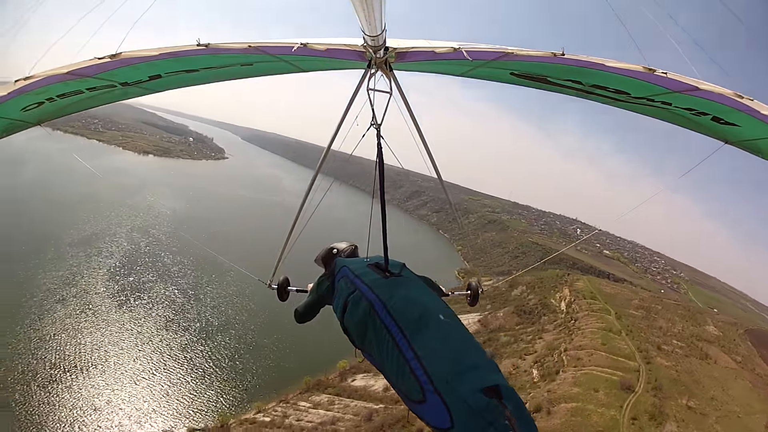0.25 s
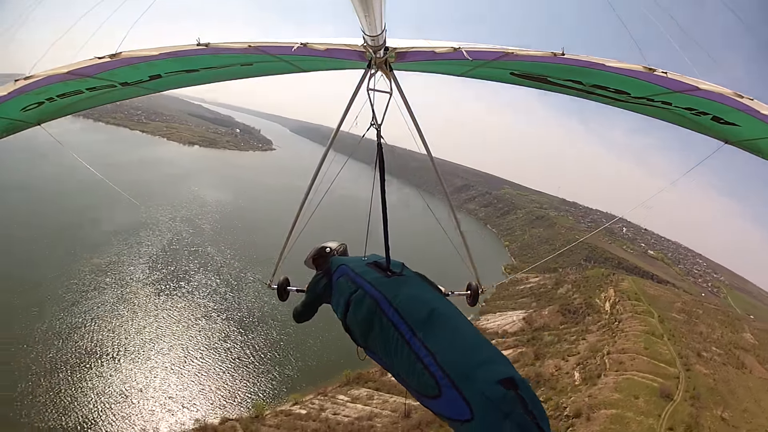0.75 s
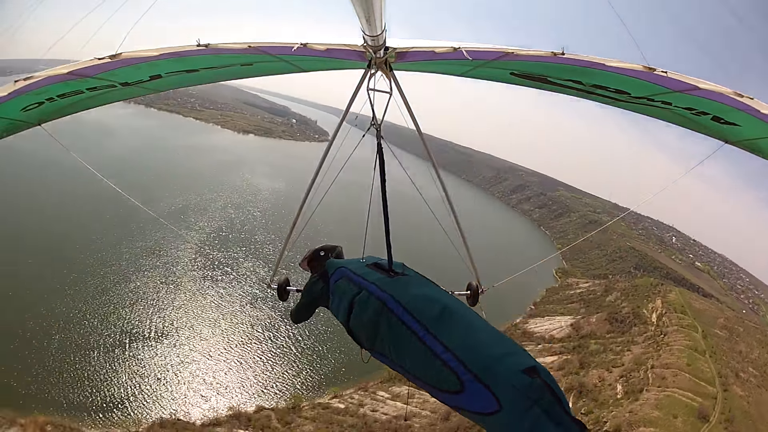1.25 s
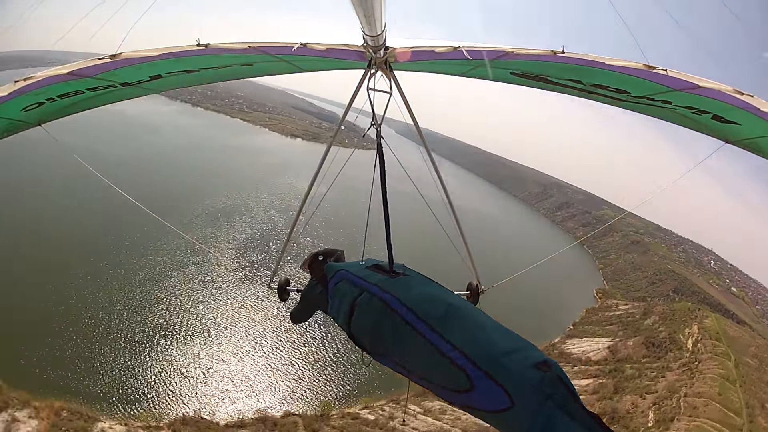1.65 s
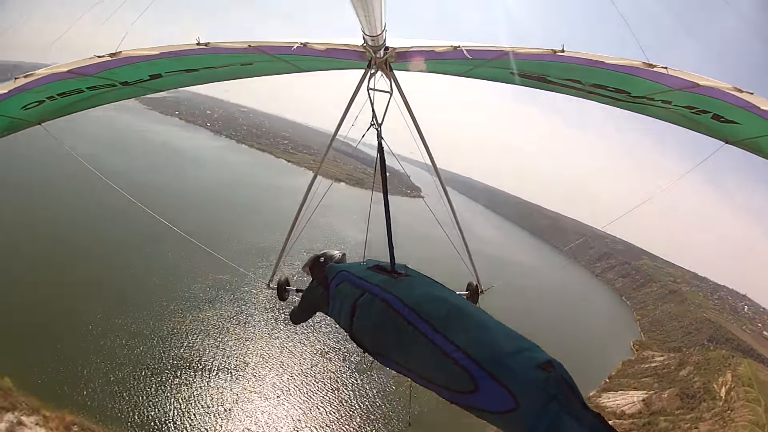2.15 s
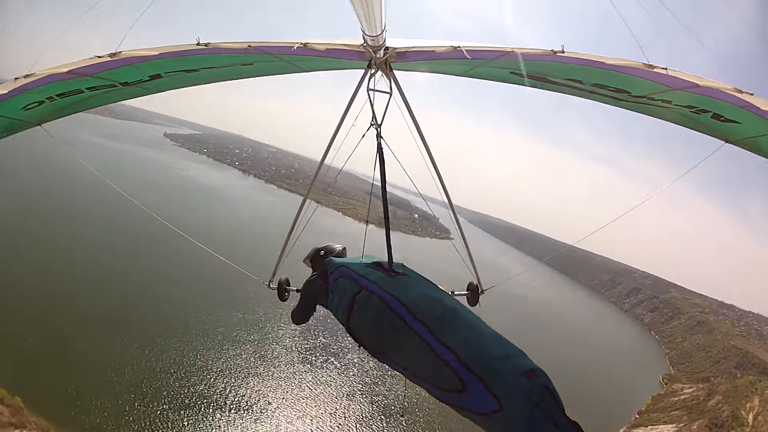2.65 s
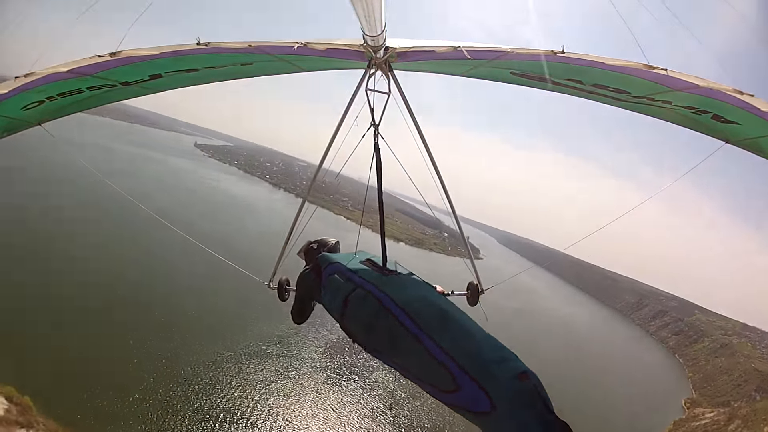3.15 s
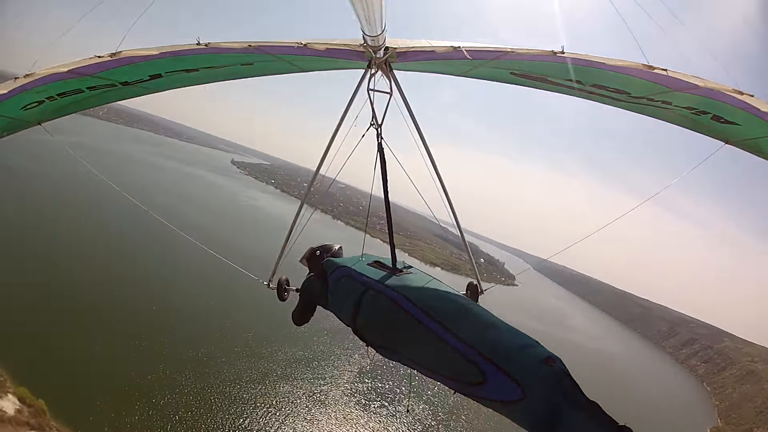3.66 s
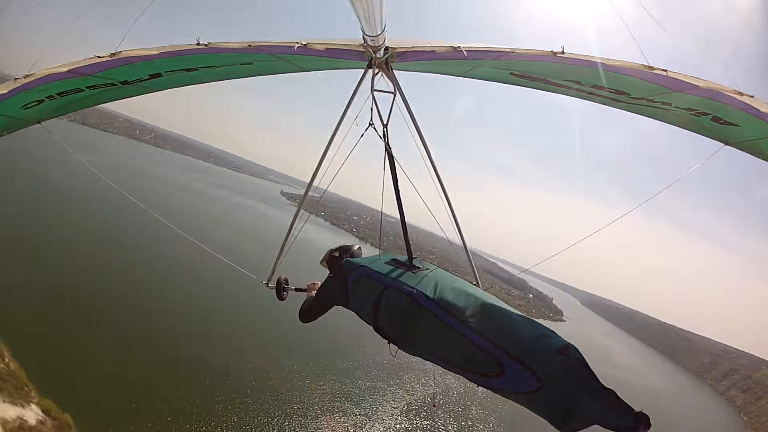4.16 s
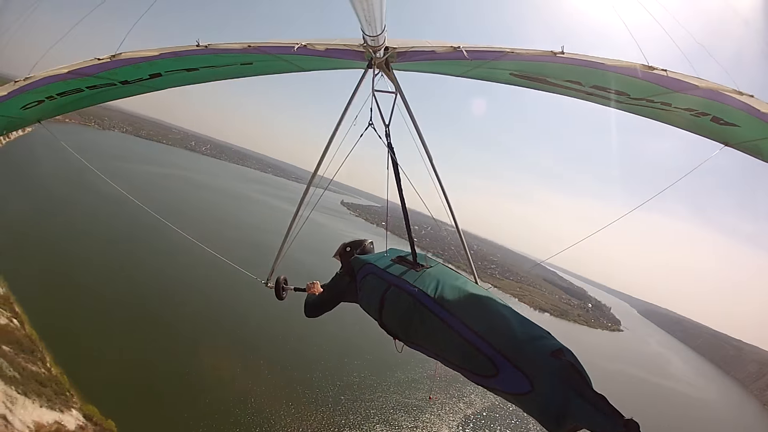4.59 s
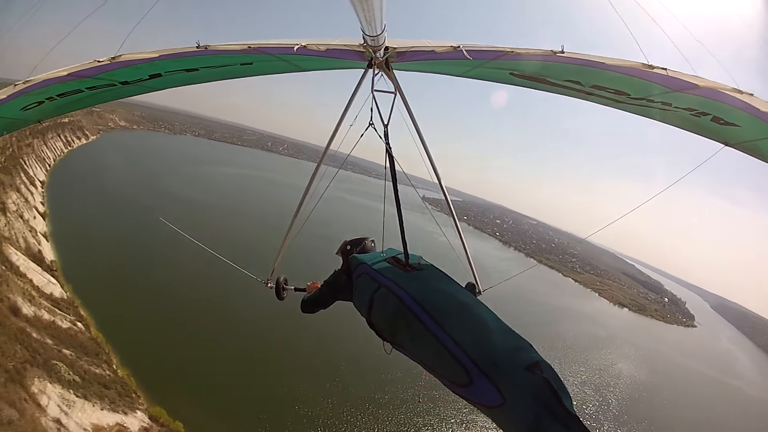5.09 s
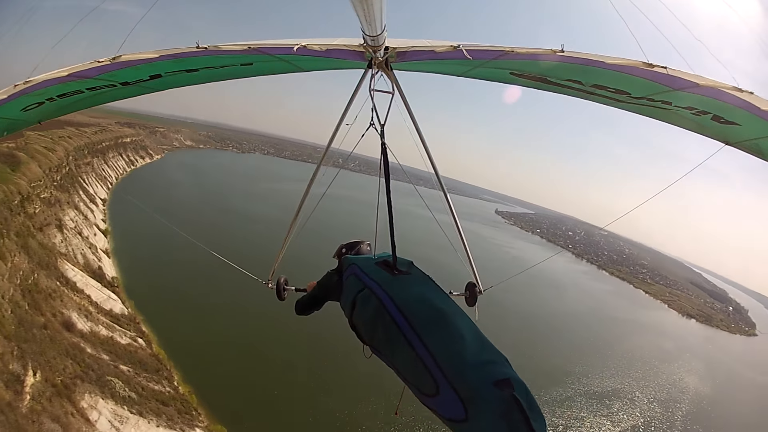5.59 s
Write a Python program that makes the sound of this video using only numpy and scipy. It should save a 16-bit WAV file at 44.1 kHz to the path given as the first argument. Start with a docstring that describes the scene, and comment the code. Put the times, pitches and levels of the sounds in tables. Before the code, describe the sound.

Heard from a camera housing fixed to a hang glider in open air: quiet, uneven wind rumble and dull flow noise, with a few isolated knocks. Knocks cluster just before two seconds, then a gust swells into heavy low buffeting and sail flutter. It eases, and one strong knock stands out past four seconds, followed by small scattered taps and a slightly hissier airflow.

```python
"""Hang glider in flight, heard at the keel tube

A small camera in its housing rides on the tube. Air buffets tube and sail: filtered noise makes a rumble
that swells in a gust, and a row of wavering overtones makes the sail flutter. Flow noise rings in the
frame, fittings knock, tick and rattle on it as decaying sines, and a wire hums faintly. The converter
holds each sample at a low rate, which mirrors the sound into the treble.
"""
import sys
import numpy as np
from scipy import signal
from scipy.io import wavfile
from scipy.ndimage import uniform_filter1d

SR = 44100
rng = np.random.default_rng(int(sys.argv[2]) if len(sys.argv) > 2 else 0)


def dump_mix(stems):
    """Bounce the given channels to the path in sys.argv[1] as a 16-bit WAV at rate SR."""
    frames = np.atleast_2d(stems).T  # one column per channel
    limited = np.clip(frames, -1, 1)  # hard clip at full scale
    pcm = np.round(limited * 32767).astype(np.int16)
    wavfile.write(sys.argv[1], SR, pcm)


N = 257103

# Ways in which the frame and housing ring, from low to high. Each row: pitch in Hz, time in seconds to die
# away by 60 dB after a knock, relative level in dB when knocked, relative level in dB in the airflow.
LOW_MODES = [(362, 0.053, 4.5, -3)]
MID_MODES = [(530.7, 0.032, 3, 3.5), (589, 0.02, 3, 0.81)]
MAIN_MODES = [(810, 0.027, -4, -1), (847, 0.047, -7, 1), (1014, 0.024, 3, 0), (1126.6, 0.048, -1, -2.5),
              (1197, 0.033, -5.5, -10.5), (1425, 0.028, -11, -7)]
HIGH_MODES = [(1921, 0.053, -13.5, -2), (2080, 0.0096, 4.5, -4), (2467, 0.013, 5.5, 3),
              (2858, 0.015, 3.5, -5), (3370, 0.014, -16, -11), (3680, 0.0088, -10.5, -7),
              (4777, 0.028, 0, -17.5), (5320, 0.0085, -14, -15.5)]

SOFT_HZ = 1960   # padding between fitting and tube dulls the contact above this


def rumble():
    """Buffeting air bends the tube; a deep and an upper part swell and sink separately."""
    # Strength of the buffeting. Each row: time in seconds, deep level in dB, upper level in dB.
    swells = [(0, -41.5, -42), (.34, -30, -38), (.5, -41, -38.5), (.85, -35.5, -39), (1.45, -38, -42),
              (1.6, -33, -40), (1.95, -39, -35), (2.1, -29, -42), (2.3, -28.5, -33), (2.55, -27, -26.5),
              (2.75, -25, -32), (2.95, -28.5, -29.5), (3.15, -27.5, -26), (3.28, -36, -37),
              (3.51, -31.5, -33.5), (3.67, -37.5, -38), (4.16, -33, -36.5), (4.3, -45, -37.5),
              (4.35, -25, -34.5), (4.48, -37, -42.5), (4.55, -30.5, -33.5), (4.87, -35.5, -42),
              (5.3, -40.5, -33.5), (5.55, -40.5, -43.5), (5.76, -30, -33.5), (5.83, -32, -38)]
    # Bending of the tube. Each row: pitch in Hz, width of the resonance in Hz, relative level in dB.
    deep_modes = [(48.6, 18, -10.5), (60.76, 13.3, -5), (35, 36, -48)]
    upper_modes = [(97.5, 24.6, -0.5), (143.4, 41, -9), (203, 87, -37), (160, 280, -10.5)]
    deep_db, upper_db = in_time(swells)
    deep = amp(deep_db) * buffeting(deep_modes, evening=0.25)
    upper = amp(upper_db) * buffeting(upper_modes, evening=0.24)
    return deep + upper


def buffeting(modes, evening):
    """Turbulence, as noise, drives each bending mode separately."""
    out = 0
    for hz, width, db in modes:
        t60 = np.log(1000) / np.pi / width
        noise = rng.standard_normal(N + SR)
        bending = ring(ring(noise, hz, t60), hz, t60)[SR:]   # drop the first second, while it builds up
        out = out + amp(db) * rms_one(bending)
    out = steep(out, 40.0, "high", order=3)
    out = steep(out, 353, "low", order=2)
    # The noise's own slow swells are partly evened, so that the level curve shapes the rumble.
    swell = uniform_filter1d(uniform_filter1d(out ** 2, size=2000), size=2000)
    return rms_one(out / (swell + .05 * np.mean(swell)) ** (evening / 2))


def flow_noise(roar_db, hiss_db):
    """Broad flow noise plus noise ringing in the frame; lows follow the roar, highs the hiss."""
    # Broad noise between the resonances. Each row: pitch in Hz, relative level in dB per Hz.
    spectrum = np.array([(120, -30), (200, 5.5), (285, -6.5), (358, 2.5), (431, -7.5), (557, -3), (700, -3),
                         (1120, -5), (1720, -11.5), (2480, -12), (3070, -20), (3700, -26), (4140, -29.5),
                         (5280, -29), (6000, -47), (7800, -77), (13200, -120)])
    edges = 180 * 2 ** np.arange(0, 5.1, 1 / 3)   # third-octave bands
    white = rng.standard_normal((2, N))   # neighbouring bands take turns with two noises
    gust = drift(25)
    broad = [0, 0]   # low part, high part
    for k, (low, high) in enumerate(zip(edges, edges[1:])):
        middle = np.log(low * high) / 2
        db = np.interp(middle, np.log(spectrum[:, 0]), spectrum[:, 1])
        band = steep(white[k % 2], [low, high], "band", order=2)
        broad[int(low > 1300)] += band * amp(db + 1.5 * gust + 1.4 * drift(17.6))
    rung = [0, 0]   # low part, high part
    for hz, t60, _, db in LOW_MODES + MID_MODES + MAIN_MODES + HIGH_MODES:
        once = ring(rng.standard_normal(N), hz, t60 * 0.75)
        twice = ring(once, hz, t60 * 0.75)   # the second pass makes the resonance fall off steeply
        rung[int(hz > 1450)] += rms_one(twice) * amp(db + 0.19 * gust + 1.3 * drift(8.4))
    roar = broad[0] / np.std(broad[0]) * amp(-2) + rms_one(rung[0]) * amp(-4.5)
    hiss = rms_one(broad[1]) * amp(-3) + rms_one(rung[1]) * amp(-4.5)
    return amp(roar_db) * roar + amp(hiss_db) * hiss


def flutter():
    """The sail's edge beats almost regularly; each overtone wavers on its own."""
    # Flutter in the gust. Each row: time in seconds, beats per second, level in dB.
    beating = [(2.05, 58.6, -45), (2.33, 51.5, -43), (2.65, 46.5, -29.5), (2.95, 48.6, -35),
               (3.2, 45, -36.5), (3.4, 47, -46)]
    # Overtones of the beat. Each row: multiple of the beat rate, relative level in dB.
    overtones = [(1, 1.5), (2, 2), (3, 0.5), (4, -6), (5, -18.5)]
    rate, db = in_time(beating)
    turn = 2 * np.pi * np.cumsum(rate) / SR
    beats = 0
    for k, level_db in overtones:
        level = amp(level_db + 1.2 * drift(8))
        beats = beats + level * np.sin(k * turn + 0.67 * drift(2.2))
    return amp(db) * fade(beating) * beats


def knocks():
    """A knock rings, thuds and sounds hollow in its own mix, which also reaches the middle and high modes."""
    # Knocks of fittings. Each row: time in seconds, ring level in dB, thud level in dB, hollow level in dB.
    hits = [(0.4688, -28.5, -41, -34.5), (0.9391, -27, -36, -51), (1.0799, -37, -45, -64),
            (1.4306, -35.5, -54, -40), (1.456, -45, -51, -38.5), (1.5437, -50, -44, -36),
            (1.582, -50, -49, -35), (1.6653, -27, -34, -34), (1.7532, -35, -44, -41),
            (1.8249, -23.5, -40, -31), (1.8715, -27, -36, -26.5), (1.9048, -26.5, -31, -26.5),
            (1.9287, -26, -35, -27.5), (1.9454, -29, -42, -44), (1.9624, -39, -33.5, -26),
            (1.9954, -26, -35, -29), (2.0664, -29.5, -55, -30.5), (2.51, -28, -50, -34),
            (2.6074, -31, -44, -35), (2.622, -37, -37, -45), (2.638, -41, -42, -32), (2.809, -36, -49, -43),
            (2.8457, -35, -53, -34), (2.8745, -26, -38, -38), (2.9085, -30, -35, -34),
            (2.941, -32, -33, -55), (3.0494, -38, -39, -39), (3.4064, -37, -47, -41),
            (3.5335, -21, -35, -40), (3.7344, -34, -29, -40), (3.923, -34, -38.5, -62),
            (4.118, -35, -32, -51), (4.287, -14, -20, -35), (4.3434, -37, -37.5, -37),
            (4.512, -43, -37, -47), (4.5667, -48, -37, -44), (4.585, -30.5, -34, -39),
            (4.6364, -40, -41, -53), (4.6796, -31, -35, -38), (4.7161, -35, -29, -40),
            (4.7411, -40, -33.5, -61), (4.835, -40, -53, -66), (4.9151, -33, -35, -53),
            (5.1668, -31.5, -42, -60), (5.4624, -38, -46, -43), (5.7565, -26, -29.5, -44)]
    # Short thuds of the shell. Each row: pitch in Hz, time in seconds to die away by 60 dB,
    # relative level in dB.
    shell = [(698, 0.014, 5.5), (1297, 0.021, -1), (2730, 0.015, 0)]
    thud_mid_db, thud_high_db, ring_high_db = -0.5, -13.5, -21   # how far thud or ring reaches other modes
    hollow_late_s = 0.00495   # the lowest mode builds up after the contact
    s, ring_db, thud_db, hollow_db = np.transpose(hits)
    mid_db = add_powers(hollow_db, thud_db + thud_mid_db)
    high_db = add_powers(ring_db + ring_high_db, thud_db + thud_high_db)

    body = strike(s, ring_db, MAIN_MODES[3:])
    body = body + strike(s, thud_db, MAIN_MODES[:3] + shell[:2])
    body = body + strike(s + hollow_late_s, hollow_db, LOW_MODES)
    body = body + strike(s, mid_db, MID_MODES)
    body = steep(steep(body, SOFT_HZ, "low", order=4), 360, "high", order=2)

    bright = strike(s, high_db, HIGH_MODES[:4] + shell[2:])
    return body + steep(bright, [1600, 3100], "band", order=2)


def rattles(roar_db):
    """Faint random taps of loose parts, rising and falling with the roar."""
    taps_per_s, rattle_db = 40.0, -10.5   # average rate, level relative to the roar
    happens = rng.random(N) < taps_per_s / SR
    strength = amp(3.9 * np.minimum(rng.exponential(1, N), 3))
    taps = happens * strength * rng.choice([-1, 1], N)
    rung = 0
    for hz, t60, db, _ in LOW_MODES + MID_MODES + MAIN_MODES:
        rung = rung + ring(taps * amp(db), hz, t60)
    return amp(roar_db + rattle_db) * steep(rung, SOFT_HZ, "low", order=4)


def ticks():
    """Hard little contacts of a wire or buckle ring a small stiff part."""
    # Thin ticks. Each row: time in seconds, level in dB.
    contacts = [(2.8085, -45.5), (2.8429, -49), (2.8734, -52), (2.9053, -46), (2.9392, -51), (3.1388, -54)]
    # Ringing of the stiff part. Each row: pitch in Hz, time in seconds to die away by 60 dB,
    # relative level in dB.
    stiff_modes = [(3280, 0.011, 4), (3900, 0.011, 4.5), (4582, 0.0081, 2), (4770, 0.015, 0),
                   (5260, .006, -8)]
    s, db = np.transpose(contacts)
    return steep(strike(s, db, stiff_modes), 3200, "high", order=2)


def wire():
    """Air swirling off a wire (vortex shedding) makes a faint wavering tone."""
    # Hum in and after the gust. Each row: time in seconds, pitch in Hz, level in dB.
    hum = [(2.2, 362, -57), (2.95, 363.8, -51), (3.3, 372.4, -49), (3.6, 360, -50.5), (3.85, 370, -62)]
    hz, db = in_time(hum)
    turn = 2 * np.pi * np.cumsum(hz) / SR
    tone = np.sqrt(2) * np.sin(turn + 1.0 * drift(9.7))
    return amp(db + 1.0 * drift(7.9)) * fade(hum) * tone


def strike(s, peak_db, modes):
    """Each event hits the modes, then bounces a few cycles later, weaker."""
    out = 0
    spread = rng.standard_normal((len(s), len(modes))).T   # every hit excites each mode a bit differently
    for (hz, t60, db, *_), own in zip(modes, spread):
        clicks = np.zeros(N)
        # First contact comes 0.7 ms before the listed time, so the ringing has built up by then.
        at = s - .0007
        size = amp(peak_db + db + 2.0 * own)
        for late_s, bounce_db in [(0, -3), (.0017, -11.5), (.008, -16), (.015, -24.5)]:
            whole_cycles_s = np.round(late_s * hz) / hz   # the bounce lands in step with the ringing
            where = ((at + whole_cycles_s) * SR).astype(int)
            np.add.at(clicks, where, size * amp(bounce_db))
        out = ring(clicks, hz, t60) - out   # neighbouring modes start in opposite directions
    return out


def ring(x, hz, t60):
    """A unit click sets a sine ringing from about height 1, dying away by 60 dB in t60 seconds."""
    r = amp(-60 / (t60 * SR))
    w = 2 * np.pi * hz / SR
    return signal.lfilter([0, np.sin(w)], [1, -2 * r * np.cos(w), r * r], x + 1e-18)


def drift(rate):
    """Slow random wandering of spread 1; a higher rate in Hz wanders faster."""
    r = np.exp(-80 * np.pi * rate / SR)   # worked out at every 40th sample
    slow = signal.lfilter([1], [1, -2 * r, r * r], rng.standard_normal(N // 40 + 2002))[2000:]
    return np.interp(np.arange(N) / 40, np.arange(len(slow)), rms_one(slow))


def steep(x, hz, kind, order):
    """Butterworth filter: keeps the lows, the highs or a band."""
    return signal.sosfilt(signal.butter(order, hz, kind, fs=SR, output="sos"), x)


def in_time(rows):
    """Columns of a curve table at every sample."""
    s, *columns = np.transpose(rows)
    return [np.interp(np.arange(N) / SR, s, c) for c in columns]


def fade(rows):
    """One while a table lasts, with short ramps either side."""
    first, last = rows[0][0], rows[-1][0]
    return np.interp(np.arange(N) / SR, [first - .1, first, last, last + 0.1], [0, 1, 1, 0])


def amp(db):
    """Decibels to gain."""
    return 10 ** (np.asarray(db) / 20)


def add_powers(a_db, b_db):
    """Level in dB of two sounds whose powers add."""
    return 10 * np.log10(10 ** (a_db / 10) + 10 ** (b_db / 10))


def rms_one(x):
    """Scale to unit power."""
    return x / np.sqrt(np.mean(x ** 2) + 1e-20)


def scene():
    """Everything reaches the one capsule through the mount and housing."""
    # Airflow. Each row: time in seconds, frame roar level in dB, hiss level in dB.
    airflow = [(0, -48, -52), (1.3, -47, -51), (2.0, -43, -46.5), (2.6, -38.5, -46), (2.9, -41.5, -48),
               (3.6, -45, -49.5), (4.5, -43, -48), (5.1, -45.5, -46.5), (5.83, -45, -44.5)]
    roar_db, hiss_db = in_time(airflow)
    air = rumble() + flow_noise(roar_db, hiss_db) + flutter() + wire()
    fittings = knocks() + rattles(roar_db) + ticks()
    return (air + fittings)[None]


def record(dry):
    """Low-pass, sample at the low rate, hold each value for four steps, cut the top."""
    hold_hz, cutoff_hz = 12000, 15700   # low sample rate, start of the fully cut top
    smooth = steep(dry, 5500, "low", order=6)
    coarse = signal.resample_poly(smooth, 40, 147, axis=1)   # 44100 * 40 / 147 = 12000 samples a second
    steps = np.repeat(coarse, 4, axis=1)   # the stair steps mirror the sound into the treble
    held = signal.resample_poly(steps, SR, 4 * hold_hz, axis=1)
    return signal.sosfilt(signal.cheby2(16, 70, cutoff_hz, fs=SR, output="sos"), held[:, :N])


dry = scene()
out = record(dry)
dump_mix(out)
```